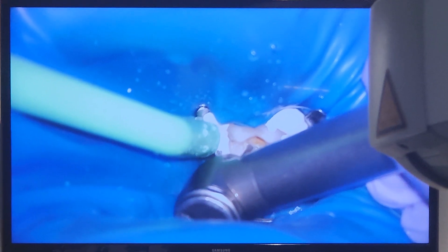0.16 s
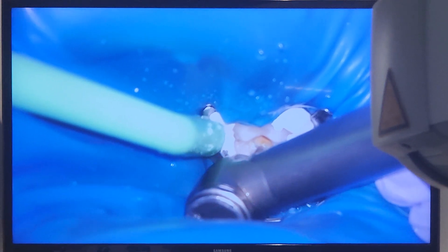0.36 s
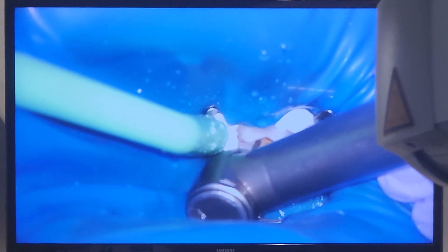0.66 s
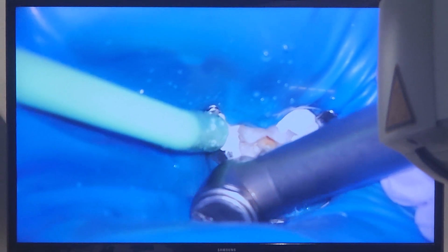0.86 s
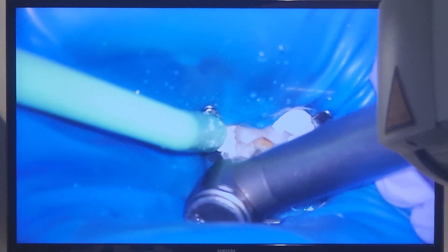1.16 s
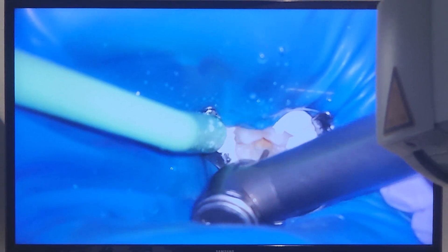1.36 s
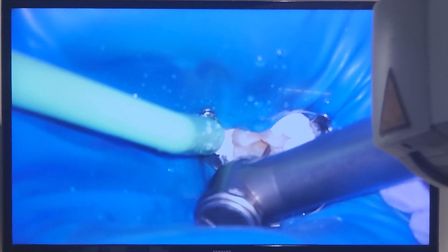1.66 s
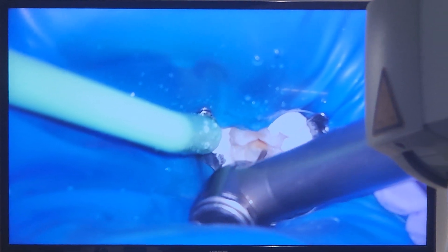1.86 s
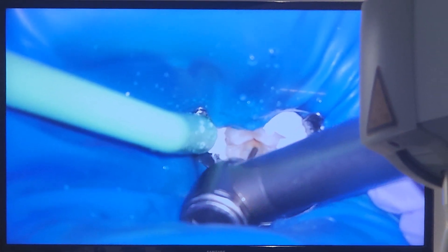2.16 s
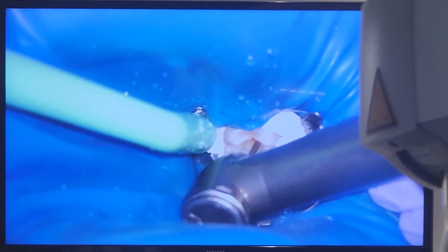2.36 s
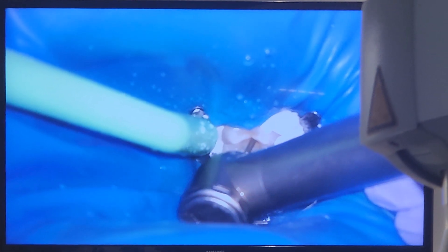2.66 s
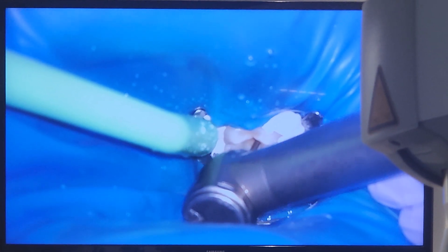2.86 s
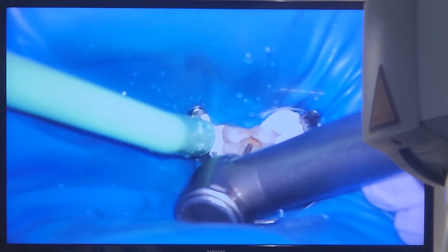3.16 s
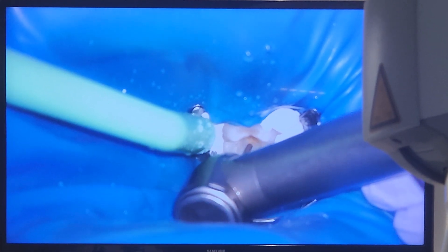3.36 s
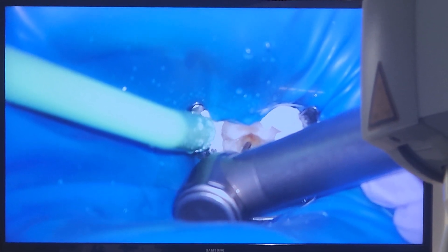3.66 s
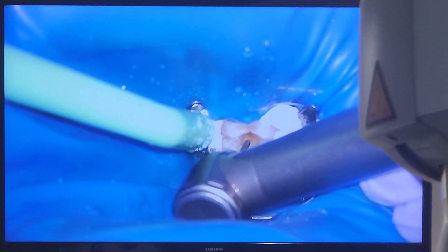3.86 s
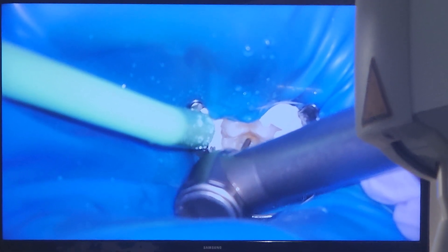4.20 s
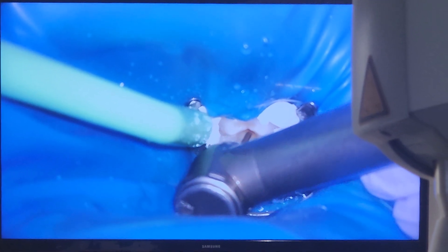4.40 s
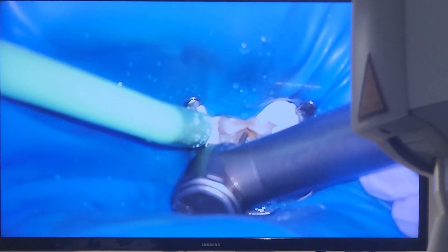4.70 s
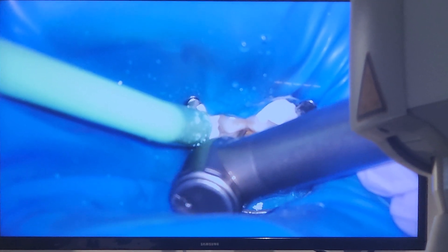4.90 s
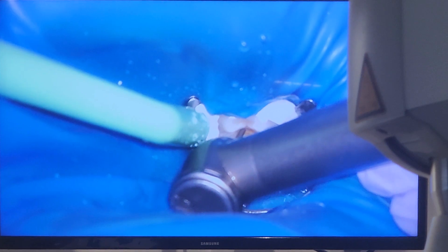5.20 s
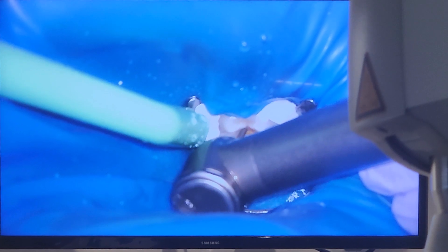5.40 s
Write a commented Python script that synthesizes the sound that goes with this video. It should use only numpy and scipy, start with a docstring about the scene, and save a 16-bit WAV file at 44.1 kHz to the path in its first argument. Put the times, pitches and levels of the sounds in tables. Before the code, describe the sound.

Shrill air-turbine drill whine wavering under load, stopping with a bright air burst and falling pitch, then rising again amid constant suction hiss.

```python
"""In a small, hard-walled surgery, two microphones hear an air-turbine dental drill whine near 7 kHz.
The whine is a sine at the rotor speed with a faint octave, sagging whenever the bur bites.
On pedal release a puff of filtered noise blows out and the rotor coasts down; then it is driven up again.
The suction tip hisses throughout as noise with tube resonances; behind lie ventilation rumble, machine hum,
brief low drones and a few soft thumps, these nearer the right microphone."""
import sys
import numpy as np
from scipy import signal
from scipy.fft import rfft, irfft
from scipy.io import wavfile
from scipy.ndimage import uniform_filter1d

SR = 44100
rng = np.random.default_rng(int(sys.argv[2]) if len(sys.argv) > 2 else 0)


def put_to_file(sound):
    """Save the sound as 16-bit audio at rate SR, in the file named by the first command-line argument."""
    columns = np.atleast_2d(sound).T  # one column per channel
    safe = np.clip(columns, -1, 1)
    whole_steps = np.round(safe * 32767)
    wavfile.write(sys.argv[1], SR, whole_steps.astype(np.int16))


N = 244314
T = np.arange(N) / SR
FREQS = np.maximum(np.fft.rfftfreq(N, 1 / SR), 1)


def amp(db):
    """Decibels to gain."""
    return 10 ** (np.asarray(db) / 20)


def curves(table):
    """The columns of a table, joined by straight lines in time."""
    seconds, *columns = np.transpose(table)
    return [np.interp(T, seconds, column) for column in columns]


def colour(table):
    """Gain over frequency for each dB column of a spectrum, joined along log frequency."""
    hz, *columns = np.transpose(table)
    return np.array([amp(np.interp(np.log(FREQS), np.log(hz), column)) for column in columns])


def resonance(hz, width_hz):
    """Gain over frequency of one steep-sided resonance."""
    detuning = (FREQS / hz - hz / FREQS) * hz / width_hz / 2
    return 1 / (1 + detuning ** 2)


def shape(x, gain):
    """Filter a sound by a gain over frequency."""
    return irfft(rfft(x) * gain, N)


def noise():
    """White turbulence at 0 dB per Hz."""
    return rng.standard_normal(N) * np.sqrt(SR / 2)


def walk(rate_hz):
    """Smooth random drift with unit spread, slower than about rate_hz."""
    drift = shape(noise(), 1 / (1 + (FREQS / rate_hz) ** 4))
    return drift / drift.std()


ROOM_T60_S, ROOM_BUILD_S = 0.33, 0.0012


def room(x, wet_db, left_delay=4):
    """Direct sound, left_delay samples later on the left, plus dense wall reflections; total power is kept."""
    t = T[:SR // 2]
    tail = rng.standard_normal((2, len(t)))
    tail *= amp(-60 * t / ROOM_T60_S) * (1 - np.exp(-t / ROOM_BUILD_S))
    tail *= amp(wet_db) / np.sqrt(np.sum(tail ** 2, axis=1, keepdims=True))
    tail[0, left_delay] += 1
    tail[1, 0] += 1
    running = np.pad(x, (len(t) - 1, 0), mode="reflect")  # the room is already ringing at the start
    heard = signal.fftconvolve(running[None], tail, mode="valid", axes=1)
    return heard / np.hypot(1, amp(wet_db))


def steady(x, span_s):
    """Hold each channel's slow level at 1 and keep its quick flutter."""
    slow_power = uniform_filter1d(x ** 2, int(span_s * SR), axis=-1)
    return x / np.sqrt(slow_power + 1e-12)


# Ventilation in the room, before the left-right balance.
# Each row: frequency in Hz, level common to both microphones and unshared level, both in dB per Hz.
VENTILATION = [(15, -66, -79), (26.8, -60.5, -61), (40, -72, -82), (60, -62.5, -92), (77.3, -61, -67),
               (102.5, -69, -90), (136, -74.5, -85.5), (164, -83.5, -107), (280, -83.5, -93),
               (600, -98, -101), (1500, -105, -105)]


def ventilation():
    """Broad low turbulence, partly common to both microphones and partly independent at each."""
    common, unshared = colour(VENTILATION)
    return shape(noise(), common) + shape(np.array([noise(), noise()]), unshared)


# Steady machine tones, before the left-right balance. Each row: frequency in Hz, level in dB.
MACHINE_HUM = [(28.7, -51.5), (86, -60), (839.8, -58)]


def machine_hum():
    """Constant-level sines whose phases wander slowly."""
    return sum(np.sqrt(2) * amp(db) * np.sin(2 * np.pi * hz * T + 0.87 * walk(rate_hz=2.4))
               for hz, db in MACHINE_HUM)


# Brief low drones, equal at both microphones.
# Each row: time of the peak in seconds, spread of the bell-shaped swell in seconds, level in dB per Hz.
LOW_DRONES = [(2.45, 0.15, -77), (2.902, 0.24, -75.5), (3.597, 0.08, -66.5), (3.75, 0.053, -68),
              (4.054, 0.028, -63.5), (4.178, 0.054, -69)]


def low_drones():
    """Noise swelling and fading through one resonance near 300 Hz."""
    swell = sum(amp(db) * np.exp(-((T - s) / spread) ** 2 / 2) for s, spread, db in LOW_DRONES)
    return shape(noise() * swell, resonance(hz=301, width_hz=113))


def thump(start_s, hz, rise_s, db):
    """A dull bump that swells quickly, peaks after rise_s and drops in pitch as it dies."""
    age = np.maximum(T - start_s, 0)
    sag_s = 0.019
    turns = hz * sag_s * np.log1p(age / sag_s)
    swell = (age / rise_s * np.exp(1 - age / rise_s)) ** 2
    return amp(db) * swell * np.sin(2 * np.pi * turns)


# Soft thumps close to the right microphone, before the left-right balance.
# Each row: start in seconds, starting pitch in Hz, time to the peak in seconds, level in dB.
SOFT_THUMPS = [(0.231, 84, 0.0076, -26), (3.752, 70.4, 0.0077, -26), (3.779, 119, 0.0087, -21),
               (3.952, 85, 0.0056, -33)]


def soft_thumps():
    """A few pitch-dropping bumps."""
    return sum(thump(*row) for row in SOFT_THUMPS)


def low_sounds():
    """Ventilation, hum and drones around both microphones, with thumps much louder on the right."""
    background = (ventilation() + machine_hum()) * amp([[-1.5], [1.1]])
    return background + soft_thumps() * amp([[-16], [5.5]]) + low_drones()


# Suction hiss at the two microphones. Each row: frequency in Hz, left and right level in dB per Hz.
SUCTION_HISS = [(200, -86, -101), (526, -76.5, -77.5), (1410, -79, -82), (2100, -75.5, -73.5),
                (3630, -69, -77), (5000, -72.5, -66), (5960, -76.5, -67), (7880, -79.5, -68.5),
                (9300, -69, -89), (11670, -75, -71), (12400, -65, -71), (14400, -64, -74),
                (15700, -66.5, -82)]
# Resonances of the suction tube. Each row: frequency in Hz, width in Hz, relative level in dB.
TUBE_MODES = [(261.5, 16.6, -76), (342.5, 55, -75.5), (529, 36, -76), (694, 57, -73.5), (1036, 130, -77.5),
              (1540, 92, -77.5), (2167, 63, -73), (2395, 84, -76), (2707, 104, -70.5), (2947, 138, -63),
              (3150, 37, -66.5), (3816, 100, -66.5), (4580, 87, -66.5)]
# How the tube's ring rises and falls; only its shape counts. Each row: time in seconds, relative level in dB.
TUBE_RING = [(0.0, -38), (0.09, -36.5), (0.91, -38), (1.06, -43.5), (1.13, -39.5), (2.52, -40.5),
             (2.75, -38.5), (3.73, -37), (3.86, -41.5), (3.98, -40.5), (5.15, -40.5), (5.54, -36)]
RING_DB = 1  # mean gain of the ring


def suction():
    """Air rushes into the tip and rings the tube; passing droplets make both flutter."""
    rush = room(noise() * amp(1.4 * walk(rate_hz=75)), wet_db=5)
    hiss = shape(rush, colour(SUCTION_HISS))
    ring_db, = curves(TUBE_RING)
    ring_db = ring_db - ring_db.mean() + RING_DB
    tube = sum(amp(db) * resonance(hz, width) for hz, width, db in TUBE_MODES)
    ring = shape(noise() * amp(ring_db + 0.67 * walk(rate_hz=21)), tube)
    # long waves reach both microphones alike
    alike = 1 / (1 + (FREQS / 780) ** 4)
    return hiss + shape(ring, alike) + shape(room(ring, wet_db=7.5), 1 - alike)


RELEASE_S, PRESS_S = 2.995, 4.036  # pedal released, then pressed again
PUFF_RISE_S, PUFF_HOLD_S, PUFF_FADE_S = 0.024, 0.054, 0.17  # the hold includes the rise
PUFF_WHISTLE_HZ, PUFF_WHISTLE_DB = 6250, np.array([[-53], [-44]])  # left and right, dB per Hz
# Puff of air at full pressure. Each row: frequency in Hz, left and right level in dB per Hz.
PUFF_AIR = [(200, -80, -89), (670, -69, -67), (1200, -77, -78), (2000, -68.5, -68.5), (4000, -63, -62.5),
            (6200, -63, -55), (7260, -56, -65), (8200, -67, -57), (9200, -67.5, -85), (10700, -59.5, -67),
            (11200, -68, -66), (12600, -52, -58), (13900, -60, -68), (15500, -51, -66)]


def puff():
    """A bright blast of air with a short whistle at release, dying away as the line empties."""
    age = T - RELEASE_S
    rise = np.clip(age / PUFF_RISE_S, 0, 1)
    pressure = rise * np.exp(-np.maximum(age - PUFF_HOLD_S, 0) / PUFF_FADE_S)
    blast = shape(room(noise() * pressure, wet_db=3.5), colour(PUFF_AIR))
    # the whistle fades twice as fast as the blast
    whistle = shape(room(noise() * pressure ** 2, wet_db=5), resonance(PUFF_WHISTLE_HZ, width_hz=60))
    return blast + whistle * amp(PUFF_WHISTLE_DB)


FREE_HZ, SLOWEST_HZ = 7155, 1300  # turns per second: free running, and still turning in the pause
# time constants, and powers above 1 for a gentle start
COAST_S, COAST_POWER = .739, 1.77
SPIN_UP_S, SPIN_UP_POWER = .261, 1.51
# The bur bites and slows the rotor.
# Each row: time of the deepest sag in seconds, half length in seconds (to 1/e), sag in turns per second.
BUR_BITES = [(0.249, 0.254, 175), (0.601, 0.078, 120), (0.834, 0.141, 225), (1.232, 0.13, 231),
             (1.817, 0.152, 295), (2.274, 0.112, 18), (2.644, 0.118, 109), (5.011, 0.092, 134),
             (5.271, 0.088, 94), (5.502, 0.083, 47)]


def rotor_speed():
    """Turns per second: free running, slowed by each bite, coasting after release and driven up again."""
    since_release = np.maximum(T - RELEASE_S, 0)
    coasting = FREE_HZ * np.exp(-(since_release / COAST_S) ** COAST_POWER)
    since_press = np.maximum(T - PRESS_S, 0)
    shortfall = (FREE_HZ - SLOWEST_HZ) * np.exp(-(since_press / SPIN_UP_S) ** SPIN_UP_POWER)
    driven = FREE_HZ - shortfall
    sag = sum(sag_hz * np.exp(-((T - s) / half_s) ** 2) for s, half_s, sag_hz in BUR_BITES)
    return np.maximum(coasting, driven) - sag


AIR_DB, AIR_DB_PER_OCTAVE = 0.06, 4  # gain of spent air at free speed, and its rise with speed
# Air leaving the turbine head, before that gain.
# Each row: frequency in Hz, left and right level in dB per Hz.
HEAD_EXHAUST = [(300, -98, -96), (1400, -87.5, -88.5), (3180, -75.5, -67.5), (4430, -70, -66),
                (5650, -70.5, -60.5), (6530, -65, -68), (9500, -78, -77), (10440, -74.5, -76),
                (13100, -73, -78), (15700, -66, -85)]


def drive_air(hz):
    """Spent air hisses from the head, louder the faster the rotor turns."""
    db = AIR_DB + AIR_DB_PER_OCTAVE * np.log2(hz / FREE_HZ)
    jet = noise() * amp(db + 0.65 * walk(rate_hz=9))
    return shape(room(jet, wet_db=1.5), colour(HEAD_EXHAUST))


# Loudness of the whine by rotor speed. Each row: speed in Hz, relative level in dB.
WHINE_BY_SPEED = [(1400, -57), (2200, -41.5), (2900, -39), (3600, -34.5), (4400, -29.5), (5400, -21.5),
                  (6500, -20), (6850, -24.5), (7200, -25)]
# The whine slowly grows a little louder. Each row: time in seconds, gain in dB.
WHINE_GROWTH = [(0, -1), (1.8, -.5), (5.54, 2)]
# Standing waves that the pitch crosses. Each row: frequency in Hz, width in Hz.
STANDING_WAVES = [(6999, 12), (7145, 50), (7085, 50)]
# Their full effect at the microphones, in the same order. Each row: left and right gain in dB.
STANDING_GAINS = [(8.5, 6.5), (1, 4.5), (-0.5, -2.5)]
STANDING_BUILD_S = 0.056  # averaging time of a standing wave


def whine_strength(hz):
    """Gain at each microphone: it follows speed and changes where the pitch lingers on a standing wave."""
    speeds, levels = np.transpose(WHINE_BY_SPEED)
    speed_db = np.interp(np.log(hz), np.log(speeds), levels)
    growth_db, = curves(WHINE_GROWTH)
    nearness = np.array([1 / (1 + (2 * (hz - centre) / width) ** 2) for centre, width in STANDING_WAVES])
    built_up = uniform_filter1d(nearness, int(STANDING_BUILD_S * SR), axis=1)
    return amp(speed_db + growth_db + np.transpose(STANDING_GAINS) @ built_up)


def turbine(hz):
    """One line at the rotor speed and a faint octave; as the pitch moves it beats with its own echoes."""
    strength = whine_strength(hz)
    # the harder the bur is loaded, the slower and less evenly it turns
    load = np.clip((hz.max() - hz) / 150, .15, 1)
    # at low speed the rotor runs roughly and the line blurs
    rough = np.clip((6500 - hz) / 3000, 0, 1)
    hz = hz * (1 + 0.00053 * load * walk(rate_hz=38) + 0.03 * rough * walk(rate_hz=440))
    phase = 2 * np.pi * np.cumsum(hz) / SR
    echoing = room(np.sin(phase) * strength.mean(axis=0), wet_db=2.5)
    whine = steady(echoing, span_s=0.1) * amp([[-5], [2.2]])
    # the octave only sings close to full speed
    full_speed = np.clip((hz - 6600) / 400, 0, 1)
    octave = room(np.sin(2 * phase) * full_speed, wet_db=-5) * amp([[-34.5], [-43]])
    return whine * strength + octave


def scene():
    """Room, suction, air and drill in the surgery."""
    hz = rotor_speed()
    return low_sounds() + suction() + puff() + drive_air(hz) + turbine(hz)


TOP_HZ = 15720  # highest frequency the recorder passes


def record(dry):
    """The recorder cuts the top steeply."""
    return signal.sosfilt(signal.ellip(12, .1, 80, TOP_HZ, fs=SR, output="sos"), dry)


dry = scene()
out = record(dry)
put_to_file(out)
```